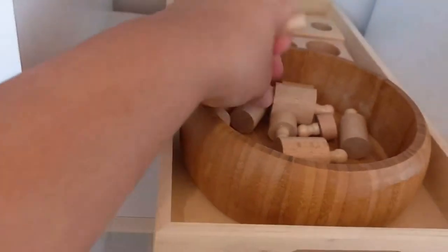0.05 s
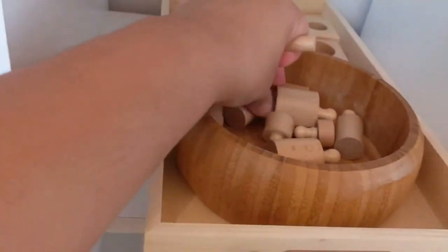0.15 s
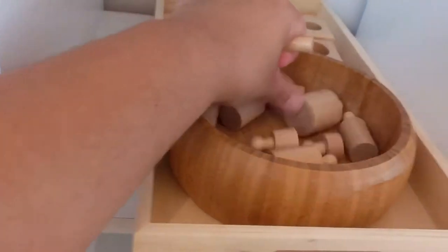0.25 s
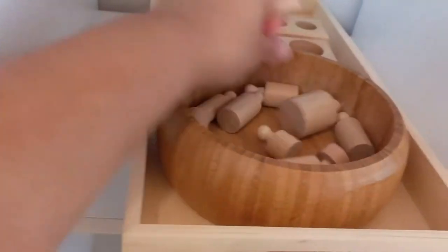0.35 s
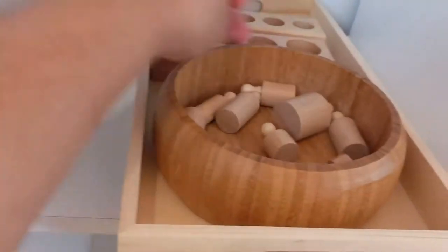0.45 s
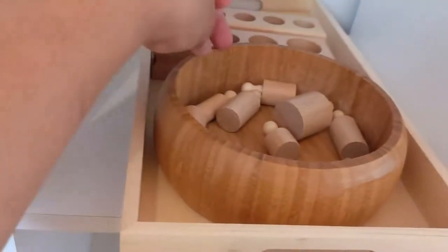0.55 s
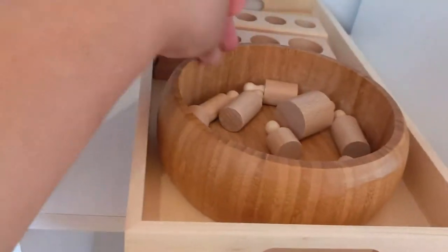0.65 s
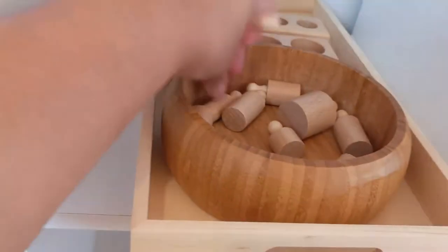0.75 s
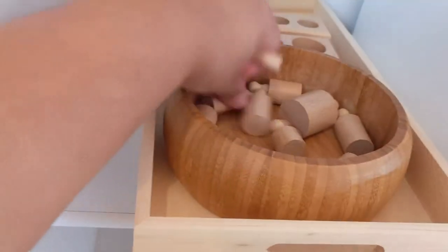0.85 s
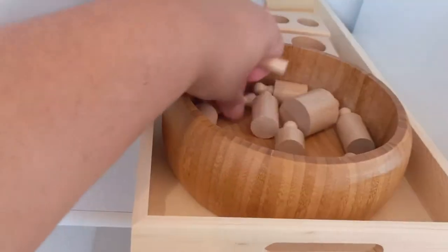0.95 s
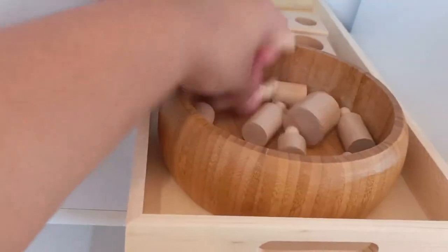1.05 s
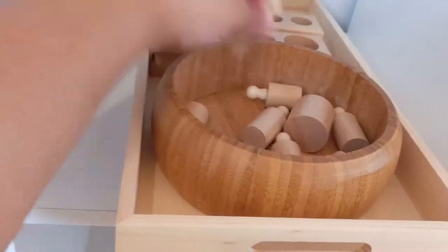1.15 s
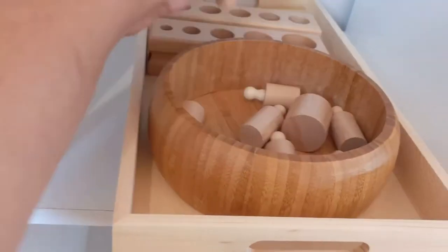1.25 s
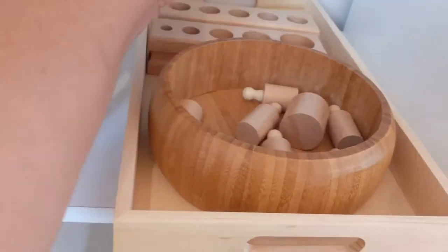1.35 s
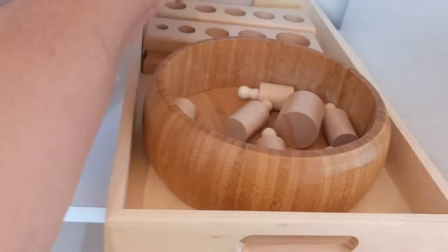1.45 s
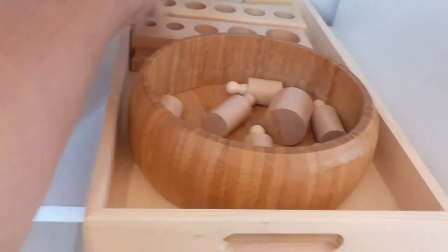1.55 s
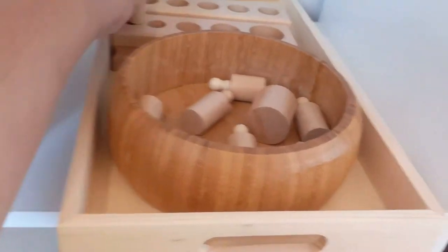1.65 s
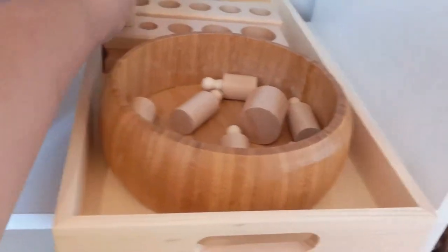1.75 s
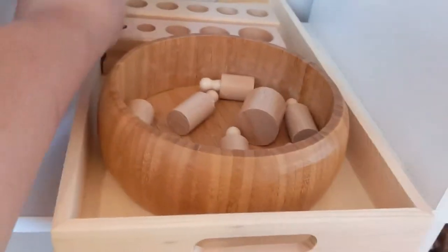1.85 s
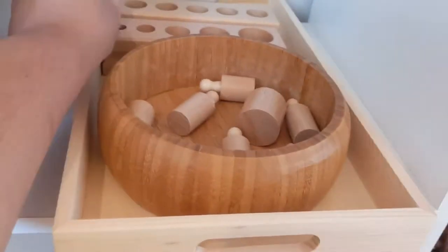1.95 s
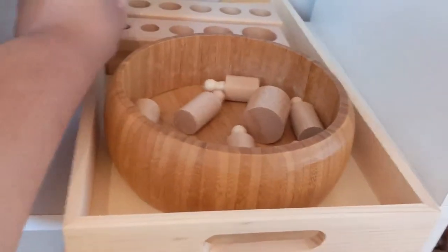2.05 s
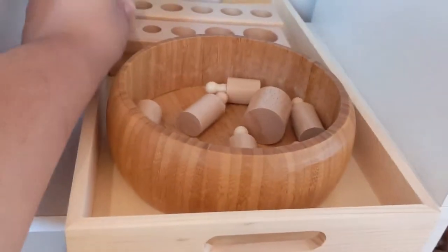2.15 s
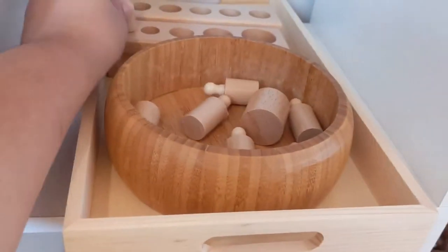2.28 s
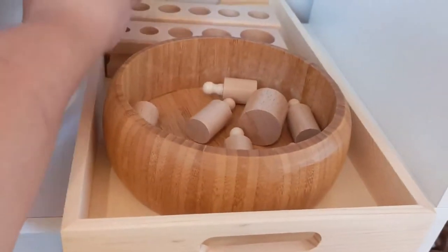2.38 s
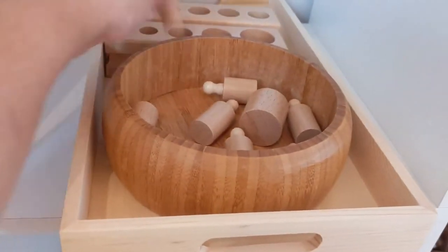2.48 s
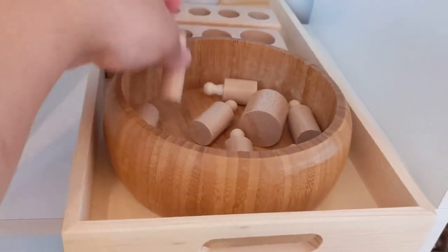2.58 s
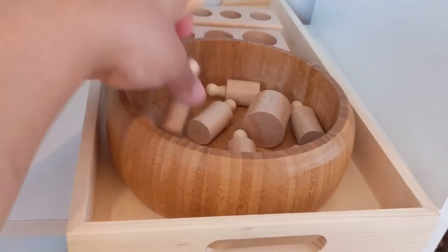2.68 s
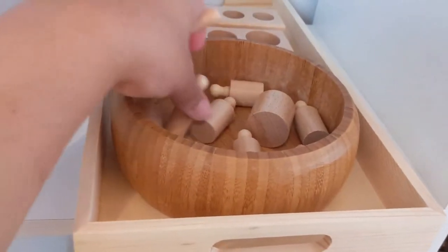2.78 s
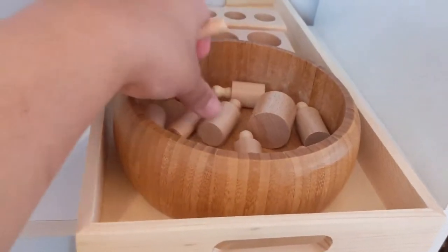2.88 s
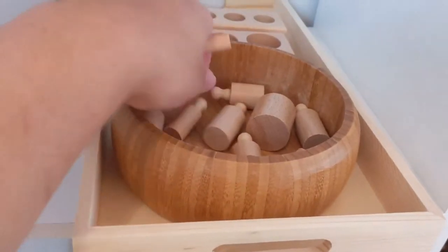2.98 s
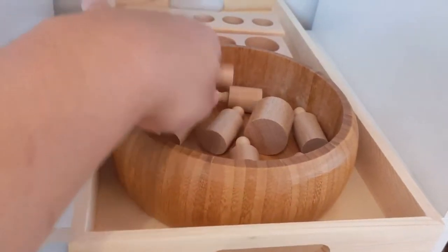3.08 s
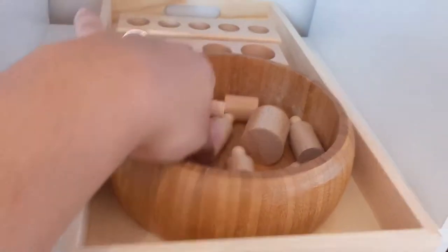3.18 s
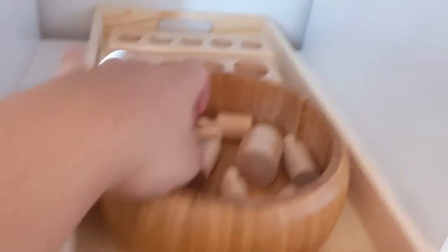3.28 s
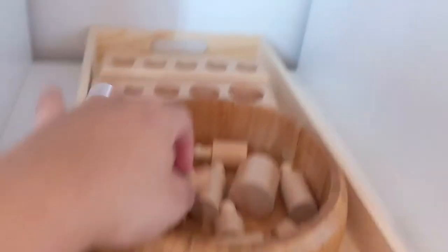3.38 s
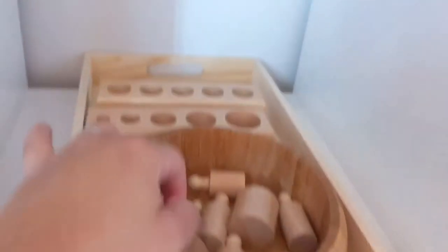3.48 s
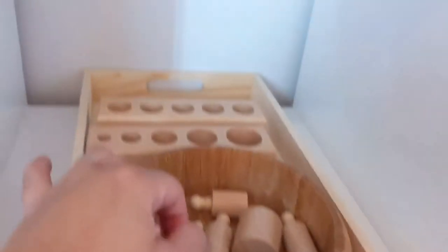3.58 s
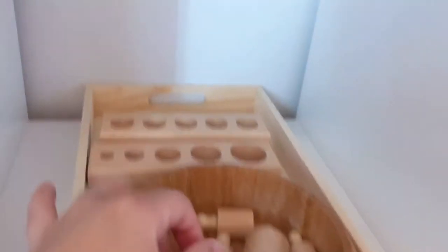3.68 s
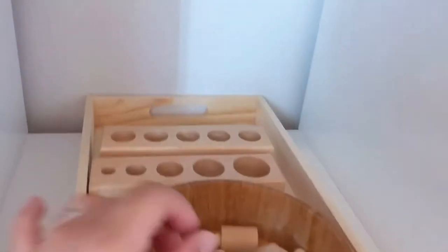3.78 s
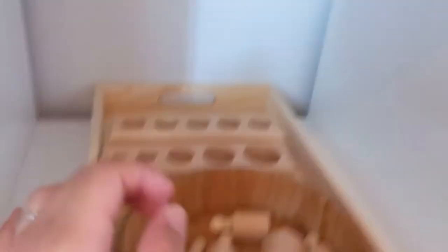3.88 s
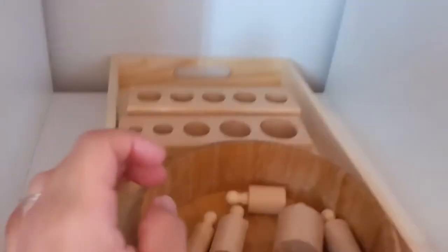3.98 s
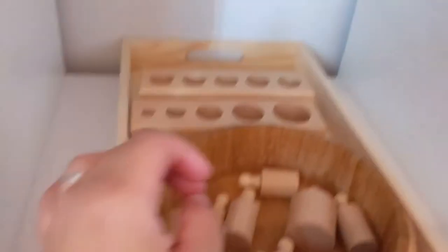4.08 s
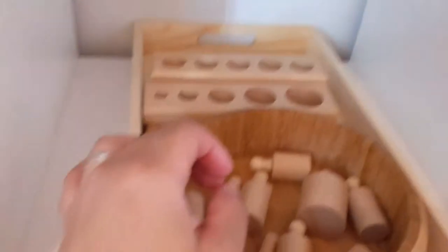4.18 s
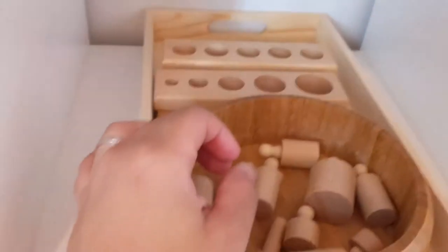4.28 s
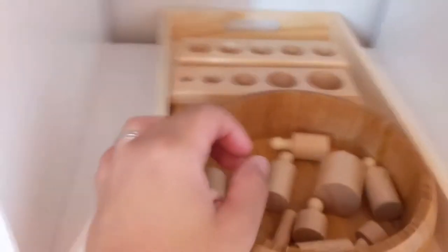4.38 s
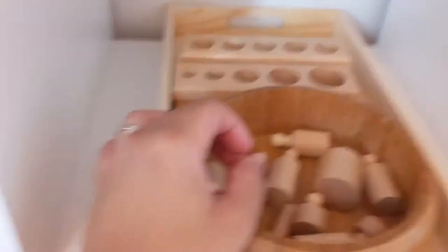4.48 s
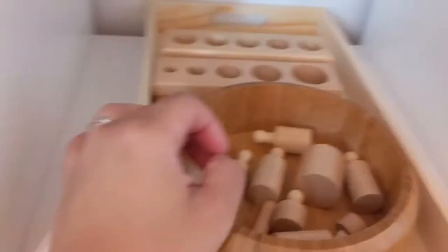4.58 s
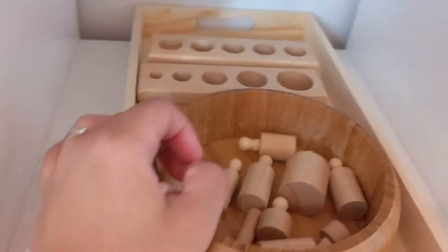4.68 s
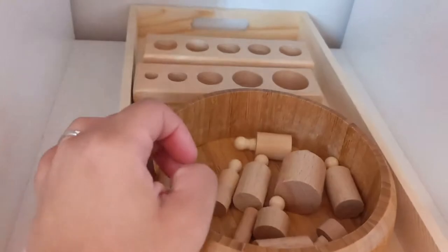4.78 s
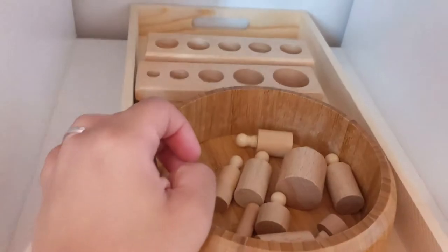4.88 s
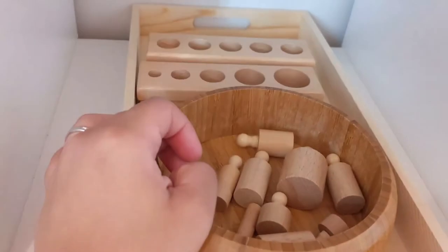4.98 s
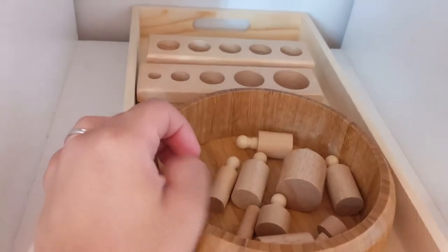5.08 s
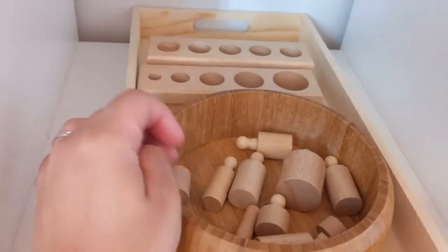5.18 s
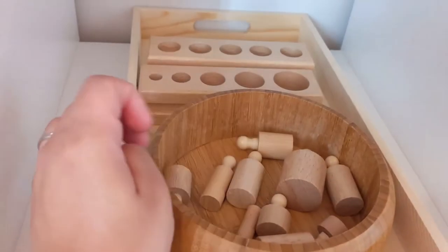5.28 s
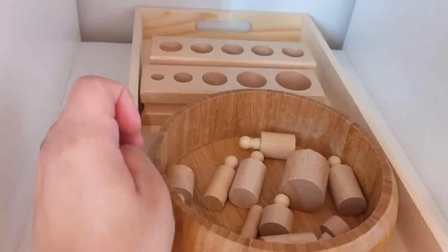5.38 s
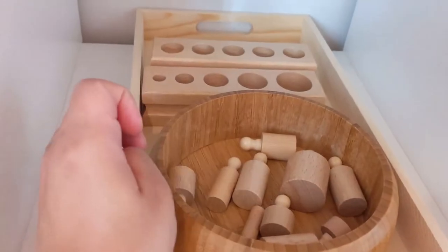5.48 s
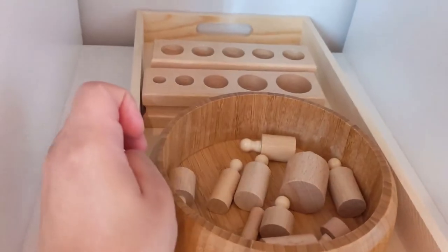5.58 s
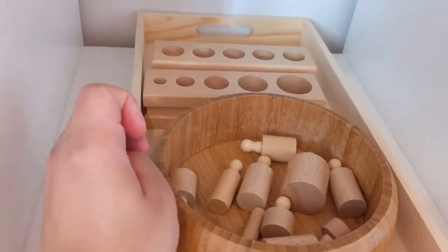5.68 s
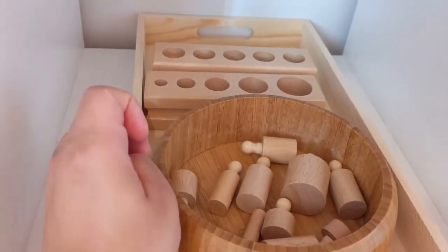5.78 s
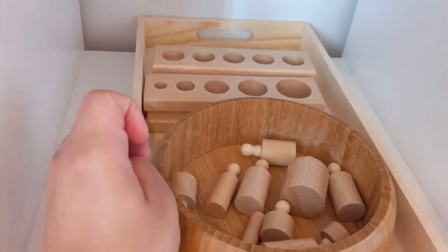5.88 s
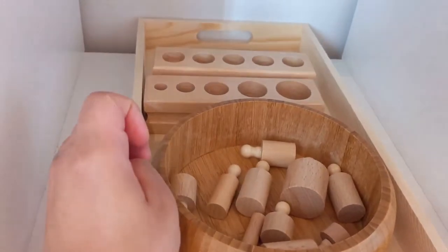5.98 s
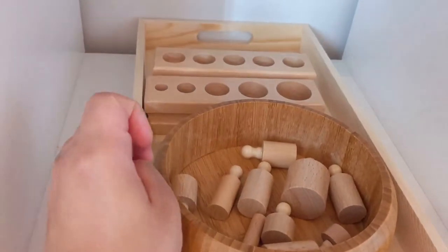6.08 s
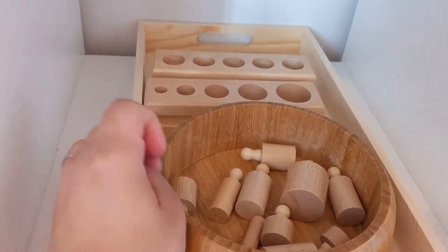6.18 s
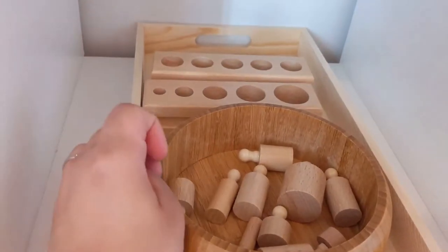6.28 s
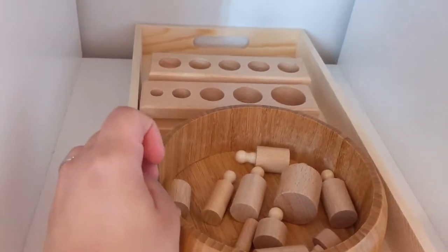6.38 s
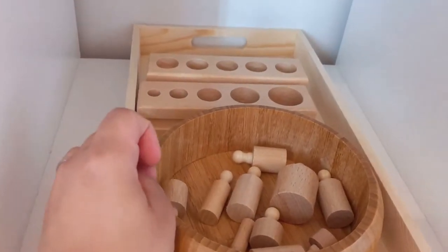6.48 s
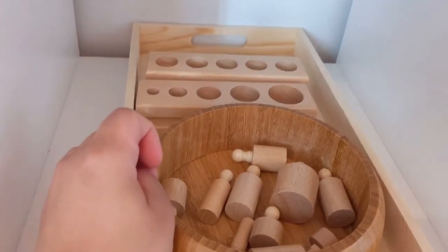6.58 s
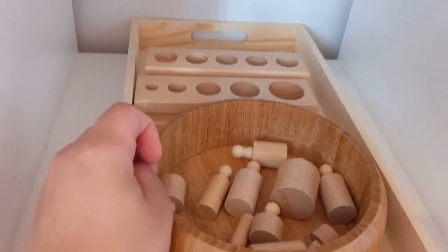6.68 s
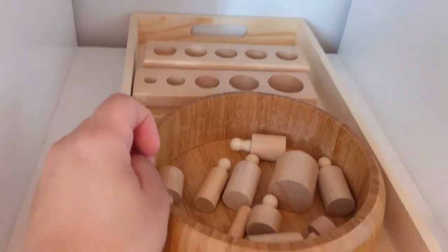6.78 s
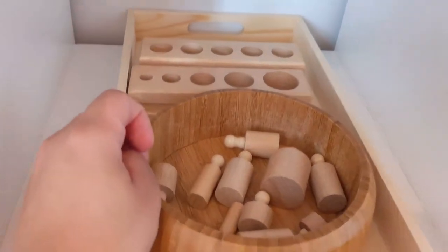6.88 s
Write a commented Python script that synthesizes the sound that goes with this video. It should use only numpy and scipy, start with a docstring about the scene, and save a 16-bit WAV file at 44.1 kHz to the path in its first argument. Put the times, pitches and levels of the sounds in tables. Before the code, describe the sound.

Close up inside a small shelf, wooden pegs clack and roll in a thick wooden bowl in two quick bursts. A pause holds a crisp tap and faint scrapes of a peg in a drilled block. A longer, brighter rummage follows, then one hard knock on the hand-held microphone, cloth rustle and small finger ticks. Quiet hiss, low rumble and a thin whistle remain.

```python
"""Wooden pegs stirred in a bowl

Small turned pegs roll, bounce and clack in a thick wooden bowl on a tray, inside a shelf, as a hand stirs them.
Contacts ring decaying modes plus noise puffs; rolling is gritty noise through the bowl's modes.
Between stirs a peg scrapes into a drilled block; later come one knock on the hand-held camera, cloth and a squeak.
Behind: shaped-noise rumble and hiss, faint wavering tones from a low hum to a very high whine,
and a thin sine whistle that swells and fades."""
import sys
import numpy as np
from scipy import signal
from scipy.fft import rfft, irfft, next_fast_len
from scipy.io import wavfile
from scipy.ndimage import map_coordinates

SR = 44100
rng = np.random.default_rng(int(sys.argv[2]) if len(sys.argv) > 2 else 0)


def digitize_waveform(pressure):
    """Quantize a signal to 16-bit integers and store it at the path in sys.argv[1].

    Rows of a 2-D input are taken as channels; values are limited to [-1, 1].
    """
    field = np.atleast_2d(pressure).T
    bounded = np.clip(field, -1, 1)
    quanta = np.round(bounded * 32767).astype(np.int16)
    wavfile.write(sys.argv[1], SR, quanta)


N = 306263

# signs of the left and right ports
SIDES = np.array([[1], [-1]])


def amp(db):
    """Amplitude factor of a level in dB."""
    return 10 ** (np.asarray(db) / 20)


def unit(x):
    """Scale to rms 1."""
    return x / np.sqrt(np.mean(x ** 2) + 1e-20)


def along(points, hz):
    """Interpolate (hz, value) points on a log frequency axis."""
    point_hz, value = np.transpose(points)
    return np.interp(np.log(hz + 1), np.log(point_hz + 1), value)


def curves(rows, outside=-120):
    """One value per sample for each column after the time."""
    s, *columns = np.transpose(rows)
    t = np.arange(N) / SR
    return [np.interp(t, s, column, outside, outside) for column in columns]


def wobble(rate):
    """Smooth random curve, rate knots per second."""
    knots = rng.standard_normal(int(N * rate / SR) + 4)
    return map_coordinates(knots, [np.arange(N) * rate / SR])


def strokes(rows, rise, fall):
    """Summed gain of (start_s, hold_s, level_db) strokes; rise and fall in dB per s."""
    t = np.arange(N) / SR
    total = 0
    for s, hold, db in rows:
        before_s, after_s = np.clip(s - t, 0, 1), np.clip(t - s - hold, 0, 1)
        total = total + amp(db - rise * before_s - fall * after_s)
    return total


def filtered(x, response):
    """Multiply the spectrum by a complex response of frequency."""
    m = next_fast_len(x.shape[-1] + SR // 4)
    return irfft(rfft(x, m) * response(np.fft.rfftfreq(m, 1 / SR)), m)[..., :x.shape[-1]]


def resonances(peaks):
    """Causal response of (hz, width_hz, level_db) resonances in alternating sign."""
    def response(f):
        total = 0
        for k, (centre, width, db) in enumerate(peaks):
            damping = 1j * f * width
            total = total + (-1) ** k * amp(db) * damping / (centre * centre - f * f + damping)
        return total
    return response


def soft(x, edge_hz):
    """Low-pass: a soft contact drives little above the edge."""
    return filtered(x, lambda f: 1 / (1 + 1.2j * f / edge_hz - (f / edge_hz) ** 2) ** 2)


# likeness of left and right: hz, likeness (1 same, -1 opposite)
LIKENESS = [(60, 0.24), (180, 1), (550, 0.93), (1650, 0.13), (4970, -0.43), (15000, -0.51)]


def paired(pair, colour):
    """Mix two unrelated signals to left and right with a set likeness per frequency; rms 1."""
    def response(hz):
        turn = np.arccos(np.clip(along(LIKENESS, hz), -1, 1)) / 2
        return colour(hz) * [np.cos(turn), np.sin(turn)]
    mid, side = filtered(pair, response)
    return unit(np.array([mid + side, mid - side]))


def grit(spread_db, clump_db):
    """Noise of unequal micro-contacts that come in clumps."""
    sizes = amp(spread_db * rng.exponential(size=N) + clump_db * wobble(70))
    return sizes * rng.standard_normal((2, N))


def puff(t, attack, t60):
    """Dying noise burst, partly shared by the ports; attack and t60 in s."""
    noise = rng.standard_normal((3, len(t)))
    envelope = amp(-60 * t / t60) * (1 - np.exp(-t / attack))
    return (noise[:2] + 1.136 * noise[2]) * envelope


def ring(modes, t, attack, scatter_db=3, detune=0.013):
    """Decaying (hz, level_db, t60_s) modes, scattered in level and pitch, and in port phase at high pitch."""
    hz, db, t60 = np.transpose(modes)[:, :, None, None]
    draw = rng.standard_normal((4, len(modes), 2, 1))
    phase = draw[0] * np.clip(hz / 2500, 0, 3)
    level = db + scatter_db * draw[1][:, :1] + 2.7 * draw[2]
    hz = hz * (1 + detune * draw[3][:, :1])
    partials = amp(level - 60 * t / t60) * np.sin(2 * np.pi * hz * t + phase)
    return np.sum(partials, axis=0) * (1 - np.exp(-t / attack))


def add(track, s, sound):
    """Mix a sound in at s seconds."""
    track[:, round(s * SR):][:, :sound.shape[1]] += sound


def panned(db, left_right_db):
    """Left and right gains; the level difference is split between the ports."""
    return amp(db + SIDES * left_right_db / 2)


# spectra of deep rumble, boom and hiss: hz, relative_db_per_hz
DEEP = [(12, -70), (20, -32.5), (35, -25.5), (54, 3.5), (110, -1.5), (140, -38.5), (240, -120)]
BOOM = [(65, -45.5), (110, -5), (150, -1.5), (274, -11.5), (355, -7.5), (450, -20.5), (580, -49),
        (990, -120)]
AIR = [(240, -39), (400, -10), (439, -11), (490, -14), (547, -5), (929, -14), (1310, -11.5), (1460, -12.5),
       (2230, -13), (3840, -16.5), (4560, -12.5), (8390, -25.5), (14300, -21.5), (15900, -37.5),
       (16700, -52)]
# low boom, louder while the tray is stirred: time_s, level_db
BOOM_LEVEL = [(0.0, -60), (0.23, -60.5), (0.37, -53), (1.16, -53.5), (1.31, -61.5), (1.55, -64),
              (1.87, -60.5), (2.72, -62), (3.07, -57), (3.52, -56.5), (3.61, -52), (4.08, -59),
              (4.52, -53.5), (5.41, -63.5), (6.67, -61.5), (6.94, -52.5)]
# faint wavering tones, from a low hum to a very high whine: hz, level_db, width_hz
WAVERING_TONES = [(147.7, -68.5, 2.7), (493.5, -70.5, 16), (1880, -81.5, 4), (13824, -87, 20),
                  (14696, -87, 20)]
# whistle swells: start_s, hold_s, level_db
WHISTLE_SWELLS = [(0.03, .03, -83), (1.38, 0.071, -71.5), (1.6, .09, -81), (1.83, 0.046, -67.5),
                  (2.15, 0.11, -78.5), (2.41, .01, -70.5), (2.66, 0.11, -81), (4.2, 0.042, -80),
                  (4.4, 0.1, -66.5), (4.82, 0.0078, -64), (5.05, 0.089, -70.5)]
AIR_DB, DEEP_DB = -64.5, -64
DEEP_SHAKEN_DB = -5.5  # relative to the shaking level
WHISTLE_HZ, WHISTLE_DB, WHISTLE_WAVER_DB = 4478, -81, 5
SWELL_RISE_DB_PER_S, SWELL_FALL_DB_PER_S = 290, 320


def room():
    """Room tone: shaped-noise rumble and hiss, narrow-band noise tones, a phase-wavering sine whistle."""
    def noise(spectrum):
        return paired(rng.standard_normal((2, N)), lambda hz: amp(along(spectrum, hz)))

    deep_gain = amp(DEEP_DB) + amp(DEEP_SHAKEN_DB + curves(SHAKE)[0])
    deep = deep_gain * amp(1.8 * wobble(29)) * noise(DEEP)
    boom = amp(curves(BOOM_LEVEL)[0] + 2.3 * wobble(16)) * noise(BOOM)
    hiss = amp(AIR_DB + 0.8 * wobble(14)) * noise(AIR)
    tones = 0
    for hz, db, width in WAVERING_TONES:
        tones = tones + amp(db) * paired(rng.standard_normal((2, N)), resonances([(hz, width, 0)]))

    steady = amp(WHISTLE_DB + WHISTLE_WAVER_DB * wobble(9.3))
    swells = strokes(WHISTLE_SWELLS, SWELL_RISE_DB_PER_S, SWELL_FALL_DB_PER_S)
    phase = 2 * np.pi * WHISTLE_HZ * np.arange(N) / SR + 0.4 * wobble(14) + 0.49 * SIDES
    whistle = np.sqrt(2) * (steady + swells) * amp(2.5 * SIDES) * np.sin(phase)
    return deep + boom + hiss + tones + whistle


# decay of the shelf and room: hz, t60_s
SHELF = [(300, 0.51), (2000, 0.15), (6000, 0.11), (14000, 0.067)]


def shelf(x):
    """Shelf and room answer: noise tail whose frequencies die at their own speeds."""
    hz, t, z = signal.stft(rng.standard_normal((2, SR // 3)), SR, nperseg=256)
    decay = amp(-60 * t / along(SHELF, hz)[:, None])
    tail = signal.istft(z * decay, SR, nperseg=256)[1]
    return signal.fftconvolve(x, tail / np.linalg.norm(tail[0]), axes=1)[:, :N]


# shaking of the camera by the grip: time_s, level_db
SHAKE = [(0, -74.5), (.6, -73), (.72, -50.5), (1.2, -74.5), (3.5, -76), (4.1, -65), (4.4, -51), (4.7, -56),
         (4.83, -49.5), (5, -58.5), (5.3, -85.5), (5.8, -61), (6.6, -81), (6.75, -47.5), (6.94, -56)]
# its spectrum: hz, relative_db_per_hz
JOLT = [(20, -28), (50, -4.5), (90, 1), (150, -2.5), (250, -9.5), (450, -21), (900, -60.5)]


def shaking():
    """The grip shakes the camera: low noise of opposite sign in the two ports."""
    jolts = filtered(rng.standard_normal(N), lambda hz: amp(along(JOLT, hz)))
    return SIDES * amp(curves(SHAKE)[0] + 1.8 * wobble(16)) * unit(jolts)


# skin and cloth: time_s, level_db, left_right_db (clipped to +-25, before an offset)
BRUSH = [(4.16, -75.5, -1), (4.456, -80, -9), (4.502, -57.5, -26), (4.54, -39, 3), (4.56, -43.5, -6),
         (4.616, -48, -22), (4.648, -40.5, -41), (4.69, -59.5, -24), (4.77, -62, -15), (5.06, -72, -7.5),
         (5.7, -81.5, -2), (6.0, -76, 8.5), (6.25, -64.5, -5), (6.45, -81, -3), (6.68, -82, -5.5),
         (6.77, -64.5, -5.5), (6.94, -72, -4.5)]
# their spectrum: hz, relative_db_per_hz
CLOTH = [(180, -55), (300, -38), (587, -15.5), (1290, -3), (2480, -2.5), (5740, -11.5), (13700, -38),
         (14900, -37), (16500, -66)]


def brushing():
    """Skin and cloth slide close to one port or the other: gritty shaped noise."""
    db, pan_db = curves(BRUSH)
    friction = paired(grit(2.1, 2), lambda hz: amp(along(CLOTH, hz)))
    return panned(db, np.clip(pan_db, -25, 25) + 6.5) * friction


# fingers on camera and tray: time_s, relative_db, pitch_hz, relative_thud_db, left_right_db (before an offset)
TICKS = [(4.202, -53, 1700, -6.5, -21), (4.335, -53.5, 677, 9, 9), (4.351, -64, 1310, 8, 6.5),
         (4.388, -44, 714, 0, -2), (4.4, -47, 750, 9, -4), (4.475, -46, 990, -17, -5),
         (4.487, -40.5, 2180, -17, -18), (4.819, -43.5, 1280, 1, -7), (4.844, -53, 1640, -1, -8),
         (4.937, -50.5, 3000, -12, -23), (4.96, -46, 1160, -5, -1), (4.978, -52, 1310, 6, -7),
         (5.006, -52, 1420, -8, -25), (5.036, -53, 2740, -14, -14), (5.051, -55, 3030, -22, -16),
         (5.065, -52, 3600, -15, -11), (5.086, -35.5, 1090, -19, -15.5), (5.093, -41.5, 3820, -21, -24),
         (5.116, -46.5, 3300, -35, -13), (5.127, -38.5, 3260, -29, -22.5), (5.146, -48, 1370, -24, -18),
         (5.78, -52, 1330, 10, 0.5), (5.95, -52, 1990, -11.5, -8.5), (6.66, -53.5, 2060, -17.5, -20),
         (6.759, -50, 1314, 6, -2.5), (6.778, -54.5, 790, 13.5, -1.5), (6.863, -54.5, 1300, -2, -1)]


def ticks():
    """Dry finger ticks: a dull click of a few cycles over a small thud."""
    track, clicks = np.zeros((2, 2, N + SR))
    t = np.arange(SR // 12) / SR
    for s, db, hz, thud_db, pan_db in TICKS:
        gain = panned(db + 3.5, pan_db + 4)
        add(track, s, gain * ring([(hz, -4, .008), (190, thud_db, .05)], t, 0.00026))
        add(clicks, s, gain * puff(t, 0.00051, 0.013))
    click_colour = resonances([(1450, 730, 3.5), (3520, 2800, -3.5), (10800, 6000, -25)])
    return (track + filtered(clicks, click_colour))[:, :N]


# blow on the camera: time_s, relative_click_db, relative_swing_db
KNOCK = [(4.5296, -1, -15.5)]
# camera body modes: hz, relative_db, t60_s
CASE = [(62, 0.5, 0.46), (97.6, -9, 0.17), (144.5, 0, .12), (221, -3, 0.069), (265, 0.5, 0.048)]


def knock():
    """Blow on the camera: click reaches the right port first, then the body swings until the hand damps it."""
    track = np.zeros((2, N + SR))
    t = np.arange(SR // 5) / SR
    click_modes = [(450, -13, .008), (650, -7, .007), (850, -5, .007), (1100, -5, .006),
                   (1500, -7, .006), (2800, -11, .007), (4500, -12, .005)]
    for s, db, swing_db in KNOCK:
        bursts = amp(-6.5) * puff(t, 0.00046, 0.0078) + amp(-39.5) * puff(t, 0.00082, 0.23)
        click = soft(bursts, 7900) + ring(click_modes, t, .0003, scatter_db=1)
        click[0] = np.roll(click[0], 14)  # left delay, samples
        hand_damping = 1 / (1 + (t / 0.044) ** 6)
        swing = ring(CASE, t, 0.0012, scatter_db=2.5, detune=0).mean(axis=0) * hand_damping
        add(track, s, amp(db) * click + amp(swing_db) * swing * np.array([[1.3], [-.7]]))
    return track[:, :N]


# peg scraping in its hole: start_s, hold_s, level_db
FITTING = [(1.528, .01, -62.5), (1.745, 0.0068, -65), (1.875, .01, -55), (1.945, .035, -45),
           (2.17, 0.065, -54.5), (2.42, 0.0063, -59), (2.5, 0.0046, -67), (2.548, 0.0054, -67.5),
           (2.745, .04, -63)]
# resonances of the hole: hz, width_hz, relative_db
HOLE = [(1790, 150, -10), (2270, 130, -2), (2720, 100, 0), (3530, 100, -12), (4130, 110, -6)]
SCRAPE_RISE_DB_PER_S, SCRAPE_FALL_DB_PER_S = 400, 540


def fitting():
    """A peg scrapes into the block: grit coloured by the hole's air and wood."""
    scrape = paired(grit(2.8, 4.7), resonances(HOLE + [(1750, 2400, -14)]))
    return strokes(FITTING, SCRAPE_RISE_DB_PER_S, SCRAPE_FALL_DB_PER_S) * soft(scrape, 5200)


# taps on block and tray, and one short squeak at 5.252 s, all levels relative:
# time_s, level_db, pitch_hz, thud_db, left_right_db (before an offset), block_db
TAPS_AND_SQUEAK = [(1.536, -39, 1797, -30, -9, -22.5), (1.727, -17.5, 4170, -25, -12.5, 5),
                   (2.395, -33, 1354, -21.5, -6.5, -21.5), (2.404, -21.5, 1160, -22, -8.5, -32.5),
                   (5.252, -39, 3600, -28, -12, -29.5)]
# drilled block modes: hz, relative_db, t60_s
BLOCK = [(317, -9, .03), (700, -10, .02), (1417, -5, .018), (1900, -7, .014), (2208, -6, .014),
         (2552, -2, .016), (3565, -6, .012), (4146, 0, .018), (5500, -12, .01)]


def taps_and_squeak():
    """Taps and a short squeak: block modes, a blunt cluster at the event's pitch, a thud and a noise click."""
    track = np.zeros((2, N + SR))
    t = np.arange(SR // 6) / SR
    for s, db, hz, thud_db, pan_db, block_db in TAPS_AND_SQUEAK:
        cluster = [(hz, -6, .018), (.7 * hz, -8, .018), (.86 * hz, -9, .015),
                   (1.14 * hz, -9, .015), (1.42 * hz, -10, .015)]
        thud = [(182.7, thud_db + 0.5, 0.16), (293, thud_db + 2, 0.039), (483, thud_db + 8.5, 0.064)]
        block = amp(block_db) * ring(BLOCK, t, 0.0012, scatter_db=2.5)
        pitched = ring(cluster + thud, t, 0.00031)
        click = amp(-7) * puff(t, 0.0017, 0.029)
        add(track, s, panned(db - 4.5, pan_db + 5.5) * (block + pitched + click))
    return soft(track, 4320)[:, :N]


# one table per stir: time_s, low_modes_db, upper_modes_db
ROLLS = [
    [(0.185, -77, -71), (0.205, -38, -48.5), (0.25, -33.5, -40), (0.36, -38.5, -45), (0.46, -39, -43.5),
     (0.58, -39, -55.5), (0.68, -50.5, -60.5), (0.77, -59, -62), (0.86, -70.5, -62.5)],
    [(0.89, -56, -64.5), (0.932, -32, -37), (0.965, -31, -40.5), (1.07, -33.5, -31), (1.12, -31.5, -33),
     (1.235, -37, -53.5), (1.27, -45.5, -57.5), (1.42, -77.5, -80)],
    [(2.89, -77.5, -74), (2.906, -36, -52), (2.925, -42.5, -56.5), (2.955, -46, -61.5),
     (3.03, -48.5, -48.5), (3.09, -49, -40), (3.14, -42.5, -40.5), (3.245, -40, -47.5), (3.365, -62, -68)],
    [(3.367, -63, -62), (3.385, -38.5, -47.5), (3.407, -51, -51), (3.5, -38, -32.5), (3.55, -38, -39),
     (3.62, -45.5, -48.5)],
    [(3.63, -42, -45.5), (3.7, -45.5, -35), (3.75, -29, -39.5), (3.825, -41, -39), (3.865, -54.5, -49.5),
     (3.945, -64, -61.5)],
    [(3.95, -62, -50.5), (3.98, -47, -45), (4.1, -62, -62.5), (4.17, -79, -89.5)],
]


def stirring():
    """Gains of the low and upper modes, summed over the stirs; near silence between them."""
    return sum(amp(curves(rows)) for rows in ROLLS)


# bowl modes: hz, relative_db, t60_s
BOWL = [(270, -20, .05), (400, -28, .04), (680, -21, .05), (1095, -4, .055), (1210, -3, .055),
        (1305, -6, .05), (1445, -8, .04), (1680, -6, .04), (1825, -2, .045), (2035, -4, .04),
        (2575, -2, .036), (3085, -4, .032), (3510, -8, .022), (4010, -8, .022), (4450, -10, .02),
        (5100, -11, .018), (5400, -12, .018)]


def rolling():
    """Rolling, sliding pegs feed the bowl's modes with a stream of tiny contacts."""
    peaks = [(hz, 7.4 / t60, db) for hz, db, t60 in BOWL]
    low_peaks = [p for p in peaks if 900 < p[0] < 2300]
    high_peaks = [p for p in peaks if p[0] > 2300] + [(6400, 1000, -13)]
    low = soft(paired(grit(2.5, 2.5), resonances(low_peaks)), 4000)
    high = soft(paired(grit(2.5, 2.5), resonances(high_peaks)), 7500)
    fizz = paired(grit(2.5, 2.5), lambda f: resonances([(12000, 5000, 0)])(f) ** 2)
    low_gain, upper_gain = stirring()
    return low_gain * low + upper_gain * (high + amp(-26) * fizz)


# contacts in the bowl, all levels relative:
# time_s, level_db, low_ring_db, peg_pitch_hz, upper_ring_db, crack_db, left_right_db (before an offset)
CLACKS = [(0.1918, -31, -16, 2250, -12, -37, -7), (0.205, -22.5, -17, 2000, -13.5, -49.5, -26),
          (0.2188, -15, -2.5, 1980, -20.5, -45, 0), (0.2386, -18.5, 4.5, 2840, -8.5, -38.5, -4),
          (0.2484, -18.5, -14.5, 1950, -5, -29, -17), (0.2569, 0, -23, 2060, -10.5, -37, -10),
          (0.2725, -12.5, -4, 2020, -11.5, -44.5, -5), (0.2915, -8.5, -12.5, 4110, -0.5, -49.5, -15.5),
          (0.3082, -6, -2.5, 3310, -6.5, -42, -3.5), (0.3276, -15, 1.5, 3720, -10.5, -33.5, -8.5),
          (0.3383, -15, -5, 2610, -18.5, -54, -10.5), (0.3484, -23, 6.5, 2090, 0, -32, -2),
          (0.3823, -0.5, -20.5, 2040, -4.5, -43.5, -3.5), (0.4091, -29, -1, 2000, -9, -46.5, 6.5),
          (0.4713, 0, -7, 2000, -9, -49, -9), (0.4883, -18, -2, 2600, -35, -52.5, -5.5),
          (0.4985, -21.5, -19, 1980, -23, -64, -3), (0.5093, -3.5, -5.5, 2860, -13.5, -53.5, -10),
          (0.5274, -24, 3.5, 2730, -12, -55, 15.5), (0.5425, -15.5, -4.5, 1990, -17, -52, -11.5),
          (0.5504, -18.5, -37, 2000, -36, -58, -14.5), (0.563, -12, -8, 2010, -13, -55, -3),
          (0.6467, -4, -19, 2070, -20.5, -62, -5), (0.711, -32, -9.5, 2400, -12.5, -38, -4.5),
          (0.974, -18, -1.5, 2080, -1, -28.5, -11), (0.9819, -15.5, -15.5, 2440, 8, -29.5, -9.5),
          (0.9885, -8, -11, 2560, -2, -29.5, -5.5), (1.0021, -11, -3, 2820, -6.5, -30.5, -4),
          (1.0203, -2.5, -14, 4150, -1, -35.5, -5), (1.0329, -5, -9.5, 2600, -28, -46.5, -1.5),
          (1.0545, -13.5, -38, 4020, 7.5, -43, -4), (1.075, -14.5, -34, 3000, 3.5, -32.5, -9),
          (1.0878, -24, -69, 4270, 2.5, -30, -1.5), (1.1048, -15.5, -19, 5000, -5, -39.5, -20.5),
          (1.1145, -14.5, -5, 2010, -15.5, -27, -7), (1.1307, -4.5, -13.5, 5100, -5.5, -24.5, -6),
          (1.1411, 2.5, -21, 2060, -14, -36.5, -10), (1.1501, -17.5, 5.5, 2100, -21.5, -71.5, -9.5),
          (1.1706, -5.5, -4.5, 1970, -13, -57.5, -7.5), (1.1875, -6, -4.5, 2000, -11.5, -47.5, -7),
          (1.1948, -11, -6, 1930, -24, -54, -6), (1.2144, -22, 6.5, 2000, -41, -51.5, -4.5),
          (1.2419, -17, -21.5, 2040, -51, -54.5, -9.5), (1.562, -40, -10, 1940, -17.5, -27, -2),
          (2.2816, -41, -3.5, 4430, -27.5, -34, -2), (2.9098, -17, -7.5, 2000, -69, -51.5, -11),
          (2.9381, -7, -12.5, 2000, -49, -65, -8.5), (2.9762, -17, -11, 2670, -33.5, -43, -9),
          (3.043, -1, -15, 2340, -3.5, -37, 2.5), (3.1116, 2.5, -15, 2580, -11, -45, -4.5),
          (3.1524, -4.5, -12, 2450, -6.5, -48.5, -12.5), (3.1772, -2, -16.5, 2620, -9, -53.5, -9.5),
          (3.1981, -8, -17, 2430, -12.5, -50, -6.5), (3.2104, -12, -14, 2030, -11.5, -51, -13),
          (3.2217, -18, -22.5, 2860, -10, -58, -13), (3.2274, -13.5, -5.5, 2860, -12, -61.5, -4),
          (3.3747, -37.5, -20.5, 2460, 2.5, -51.5, -18.5), (3.3958, -28.5, -27.5, 4300, -4.5, -19.5, -12),
          (3.4173, -0.5, -15, 3530, -5, -22, -3.5), (3.43, 2, -12.5, 2560, -5.5, -43.5, -4.5),
          (3.4507, -8.5, -10, 3150, -13.5, -37, 1), (3.4558, 1, -20.5, 3690, -4.5, -37.5, -1),
          (3.4679, -15, -12, 2050, -4.5, -36.5, -3), (3.476, -4.5, -16.5, 3560, -12, -37.5, 3),
          (3.4818, -5.5, -18, 2560, -5, -31.5, -11), (3.5013, -2.5, -13, 3730, -2, -30.5, -7),
          (3.5141, -8.5, -7.5, 2500, -6.5, -38, -2), (3.5301, -5.5, -23.5, 4250, -10.5, -52.5, -6.5),
          (3.6145, -25, -14, 2510, -9, -37.5, -14), (3.6331, -0.5, -9.5, 2210, -5, -38, -5.5),
          (3.6477, -14, -11, 3900, 0, -26.5, -7), (3.6589, -2, -11, 5880, -6, -28, -5.5),
          (3.6722, -0.5, -10, 5370, 0.5, -30.5, -3), (3.6863, -17.5, -9.5, 2540, -20, -28.5, -3.5),
          (3.725, -8, -5, 1990, -6, -26.5, -2.5), (3.7332, -8.5, -51.5, 2620, -1.5, -34.5, -10),
          (3.7683, -7.5, -12, 5800, 3, -38, -4), (3.7978, -17.5, -12, 4640, 3.5, -40.5, -8.5),
          (3.812, -12, -12.5, 3180, -9, -40, -9.5), (3.8995, -34, -0.5, 1930, -6.5, -29, -5),
          (3.955, -31.5, -18, 2320, -9, -23.5, -9.5)]


def clacks():
    """Contacts ring bowl and peg; modes too close to tell apart sound as dying noise."""
    track, low, middle, upper, treble = np.zeros((5, 2, N + SR))
    t = np.arange(SR // 8) / SR
    hz, level, t60 = np.transpose(BOWL)
    for s, db, low_db, peg_hz, upper_db, crack_db, pan_db in CLACKS:
        # tilt: where and how hard it lands
        tilt_points = [(1400, low_db + 11.5), (1650, 0.0053), (2100, 0.0021), (2500, upper_db + 5.5)]
        bowl_modes = np.transpose([hz, level + along(tilt_points, hz), t60])
        peg_modes = [(peg_hz, upper_db + 7, .018), (.83 * peg_hz, upper_db + 2, .015),
                     (1.23 * peg_hz, upper_db + 2, .012)]
        bowl = ring(bowl_modes, t, 0.0036, detune=.005)
        peg = ring(peg_modes, t, .0008)
        gain = panned(db - 13, pan_db + 6)
        add(track, s, gain * (bowl + peg))
        add(low, s, gain * amp(low_db + 3) * puff(t, .002, 0.081))
        add(middle, s, gain * amp(8.5) * puff(t, 0.00065, 0.039))
        add(upper, s, gain * amp(upper_db + 11.5) * puff(t, 0.0012, 0.022))
        add(treble, s, gain * amp(crack_db + 20) * puff(t, 0.0023, 0.026))

    low = filtered(low, resonances([(1260, 340, 0.0033)]))
    middle = filtered(middle, lambda f: resonances([(1880, 600, 0)])(f) ** 2)
    upper = filtered(upper, resonances([(2510, 960, -0.5), (4250, 1800, 0), (5730, 500, -3), (6580, 170, -9.5)]))
    crack = filtered(treble, lambda f: resonances([(9800, 2500, -2), (12500, 4000, 0)])(f) ** 2)

    def wall(f):  # the thick wall hardly radiates below its first mode
        ratio = f / 950
        return ((1j * ratio) ** 2 / (1 + 1.1j * ratio - ratio ** 2)) ** 2

    dense = filtered(low + middle + upper, wall)
    return (soft(track + dense, 8300) + crack)[:, :N]


def scene():
    """Sum all sources; the clacks, taps and squeak also excite the shelf."""
    bowl, block = clacks(), taps_and_squeak()
    background = room() + shaking() + brushing() + ticks() + knock()
    answer = shelf(amp(-10) * bowl + amp(-11.5) * block)
    return background + answer + fitting() + rolling() + bowl + block


# difference of the two microphone ports: hz, left_right_db
PORTS = [(60, -1.5), (130, 0), (290, 1), (640, 1.5), (1410, -6.5), (3100, -7), (6820, -4.5), (15000, 12)]
TOP_HZ = 16100


def record(dry):
    """Colour each port, cut below 40 Hz, round off the highest peaks, band-limit."""
    def port_response(hz):
        return amp(SIDES * along(PORTS, hz) / 2) * hz ** 4 / (hz ** 4 + 40 ** 4)
    ports = filtered(dry, port_response)
    rounded = ports / (1 + np.abs(ports / .98) ** 6) ** (1 / 6)
    return filtered(rounded, lambda hz: hz < TOP_HZ)


dry = scene()
out = record(dry)
digitize_waveform(out)
```